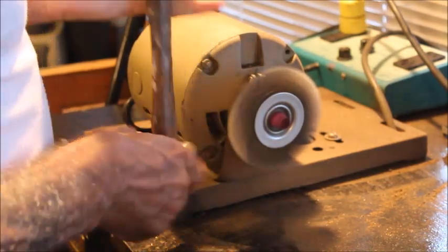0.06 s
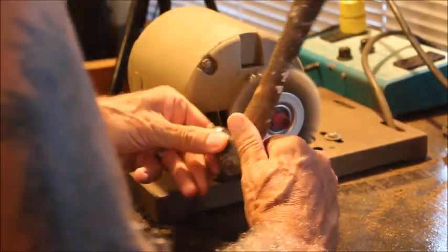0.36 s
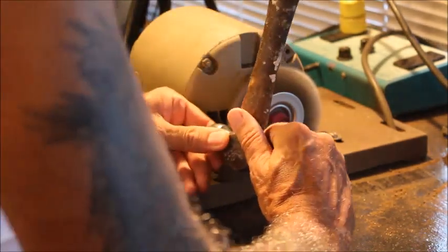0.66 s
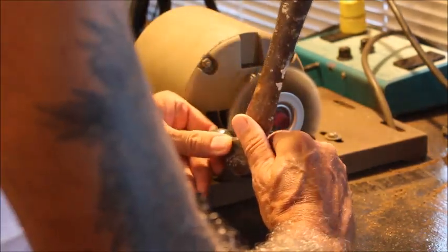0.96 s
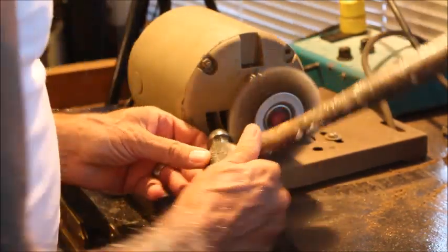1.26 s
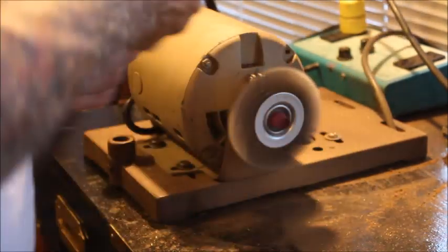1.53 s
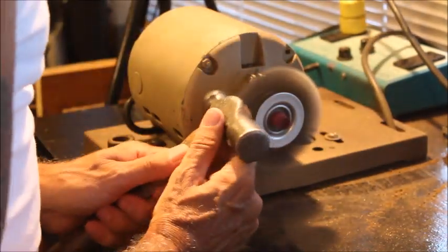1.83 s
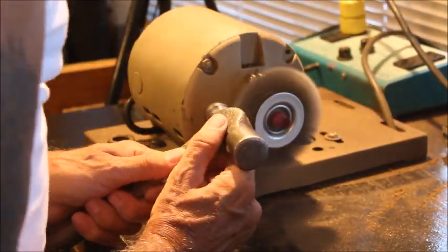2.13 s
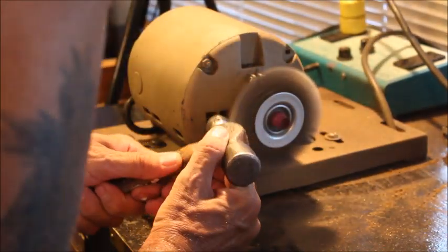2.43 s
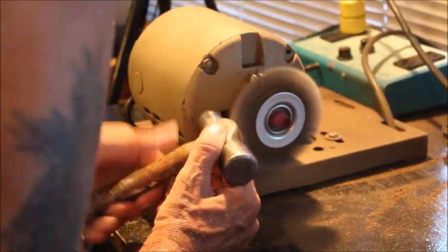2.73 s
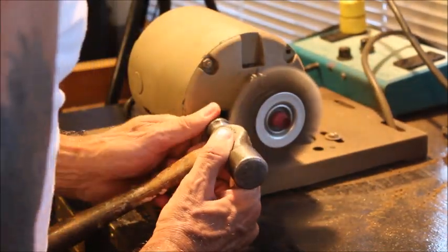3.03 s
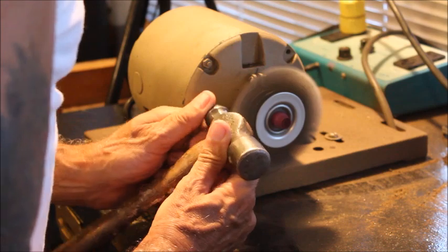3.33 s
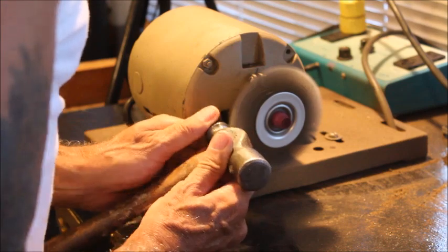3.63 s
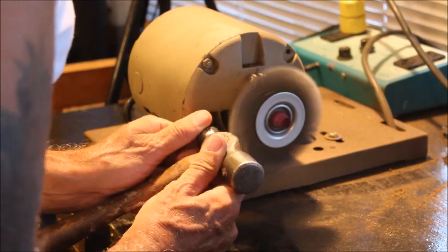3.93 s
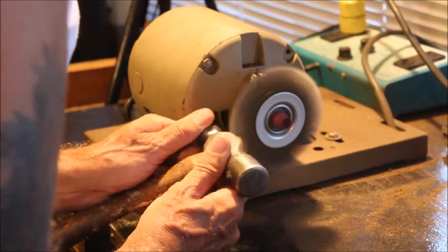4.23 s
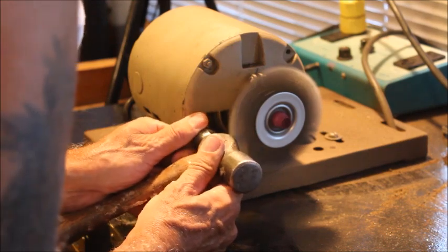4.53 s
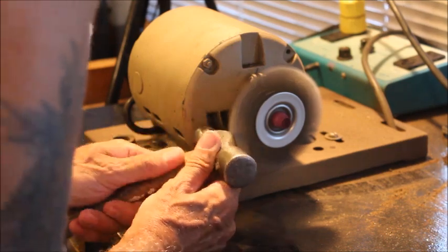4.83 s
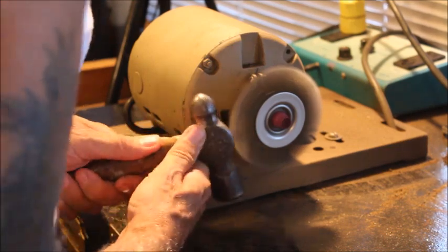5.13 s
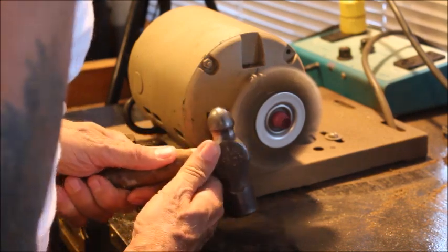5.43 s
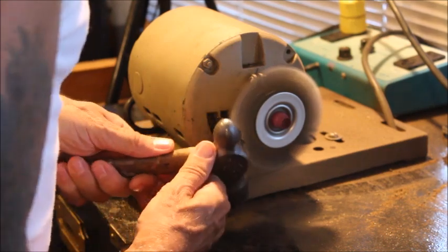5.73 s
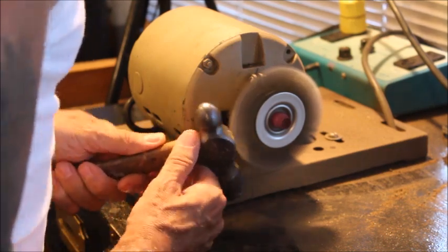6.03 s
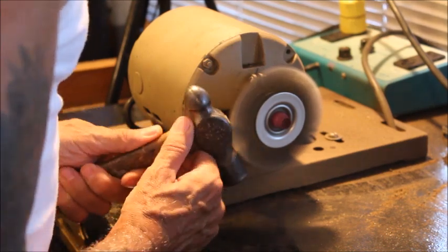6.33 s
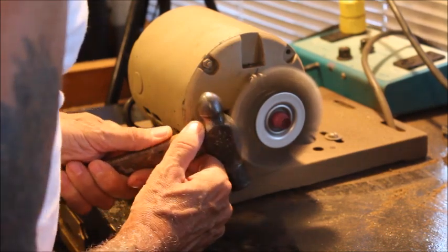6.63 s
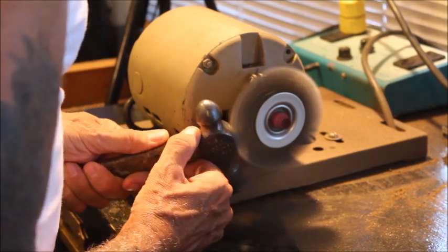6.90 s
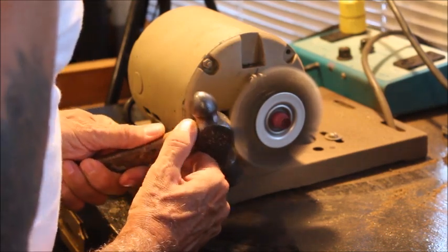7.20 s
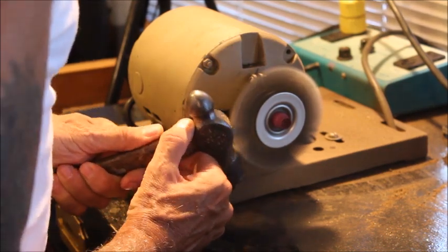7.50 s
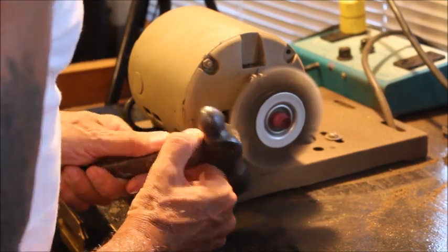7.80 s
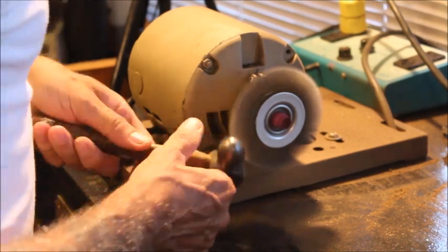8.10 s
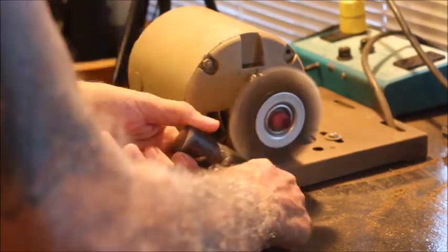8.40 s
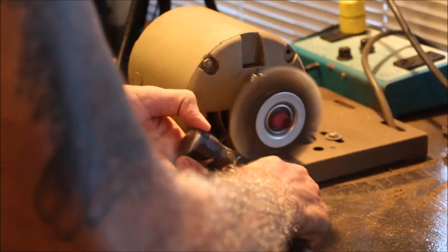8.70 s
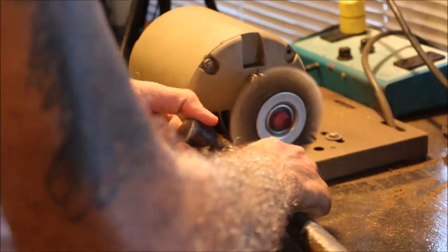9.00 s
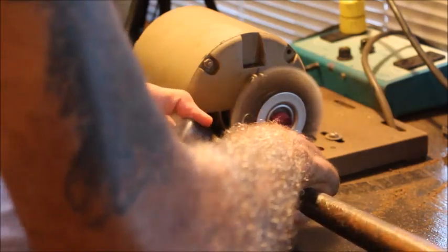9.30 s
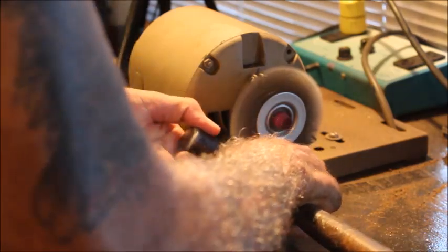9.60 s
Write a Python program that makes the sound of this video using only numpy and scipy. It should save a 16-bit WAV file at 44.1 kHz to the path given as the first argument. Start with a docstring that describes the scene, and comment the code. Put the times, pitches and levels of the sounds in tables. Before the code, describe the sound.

Close up at a workbench, a small bench grinder hums as a steel hammer head is pressed into its wire wheel. The wires rasp, hiss and rattle in a fast buzz whose pitch sags and wavers with the pressure. Early on the hammer lifts off twice, leaving the motor buzzing freely, and clicks once sharply against metal. Then the scouring runs almost unbroken, with a softer click near the end and more ragged rattling.

```python
"""A wire wheel on a small bench grinder scours a steel hammer head, close to one microphone at a workbench.
The lopsided brush slaps the steel twice a turn; its wires rasp, hiss and rattle on the edges, and the
beat sags and wavers as the work drags on the rotor. Behind it the motor hums on the mains and buzzes
when it runs free. Faint tones glide underneath, and twice the hammer clicks against metal."""
import sys
import numpy as np
from scipy import signal
from scipy.fft import rfft, irfft, next_fast_len
from scipy.io import wavfile
from scipy.ndimage import uniform_filter1d, minimum_filter1d, map_coordinates

SR = 44100
rng = np.random.default_rng(int(sys.argv[2]) if len(sys.argv) > 2 else 0)


def to_wav(sig):
    """Store sig (one row per channel, or 1-D mono) as 16-bit WAV at the path in sys.argv[1].

    Samples outside -1..1 are clipped; the rate is SR.
    """
    pcm = np.clip(np.atleast_2d(sig), -1, 1) * 32767
    pcm = np.round(pcm).astype(np.int16)
    wavfile.write(sys.argv[1], SR, pcm.T)  # frames by channels


N = 429975
HUM_HZ, FREE_SLAP_HZ = 120, 119.7  # twice the mains frequency; two slaps a turn with no load

# magnetic hum: multiple of HUM_HZ, level/dB, change under load/dB, more if also flat/dB, waver/dB
HUM_LINES = [(1, -65, -1, 4, 1), (4, -33, -4.5, 4.5, 0.5), (5, -45, 5.5, -23, 0), (7, -38, -4.5, -21, 2)]
# faint tones under the machine: start/s, end/s, first f/Hz, last f/Hz, level/dB
GLIDE_TONES = [(0.47, 0.9, 304, 452, -44.5), (1.985, 2.437, 375, 552, -46), (2.36, 3.054, 275, 406, -38.5),
               (2.629, 3.004, 690, 840, -34), (2.998, 3.457, 415, 583, -41), (3.473, 3.75, 380, 429, -39),
               (3.976, 4.726, 220, 327, -43.5), (4.905, 5.37, 292, 350, -41.5), (4.92, 6.05, 193, 141, -49),
               (7.842, 8.546, 302, 323, -42), (8.3, 8.75, 495, 570, -41), (8.721, 9.414, 405, 447, -42.5)]
# lift of the drone near 835 Hz: t/s, level/dB
DRONE_LIFT = [(.3, -2.5), (1.5, -2), (1.68, 3), (2.1, -7), (2.5, -0.5), (4.05, 2.5), (4.6, -1), (5.85, 2),
              (6.9, 1.5), (8.1, 0.5), (9, -1.5)]
# spectrum of the buzzing housing: f/Hz, level/dB
HOUSING_SPECTRUM = [(120, -32), (236, -22.5), (360, -12), (480, -16), (598, 2.5), (718, -22), (838, -9),
                    (958, -5.5), (1077, -12), (1197, -26), (1437, -3), (1560, 2.5), (1680, -1.5),
                    (1916, -1), (2155, -7.5), (2275, -7), (2515, -2), (2635, 1), (2755, -7), (2875, -7),
                    (3240, -11.5), (3360, -13), (3480, -42), (3720, -31), (3830, -11), (4070, -9),
                    (4550, -17.5), (5400, -18.5)]
# swell of the free-running buzz: t/s, level/dB, tilt to the upper housing resonance/dB
IDLE_SWELL = [(.05, -0.5, -8), (.15, -1, 0), (.27, 0.5, 5.5), (.38, 2.5, -3.5), (1.41, -2.5, -1),
              (1.54, -0.5, 4.5), (1.66, -.5, -3.5), (5.1, 4.5, 1.5), (8.35, -1, -2)]
# spectrum of air and bearings: f/Hz, level/dB
AIR_SPECTRUM = [(25, -32), (70, -16), (105, -11.5), (170, -1.5), (230, -8.5), (320, 4), (900, 6),
                (1200, 0.5), (2600, 5), (4200, -5.5), (5300, -7), (7000, -5), (10000, -8.5), (14500, -14.5)]
# narrow resonances in the air and wire noise: f/Hz, width/Hz, lift/dB
NARROW_PEAKS = [(2640, 110, 5), (3880, 130, 5), (4120, 100, 4), (4460, 120, 6), (4670, 120, 5),
                (7050, 400, 3), (12550, 140, 5), (13400, 120, 4), (14050, 160, 6), (14800, 130, 5)]
# the hammer meets metal: t/s, level/dB, relative knock/dB, relative crack/dB
HAMMER_CLICKS = [(1.588, 2.5, -13, -13), (8.006, -9, 5, -13)]
# modes of the hammer head: f/Hz, level/dB, t60/s
HAMMER_MODES = [(3170, 0.5, 0.039), (4880, -7, 0.051), (5700, -27, 0.074), (6050, -26, 0.054),
                (9500, -3, 0.034), (9650, 7, 0.042), (11450, -8, 0.045), (12400, -27, .026)]
# modes of the knocked machine: f/Hz, level/dB, t60/s
KNOCK_MODES = [(1310, -3.5, 0.05), (1530, 4, 0.046), (2170, -21, .03), (2600, -4.5, 0.046),
               (4160, -5.5, 0.058)]
# the head goes into the wheel: start/s, end/s, contact/0-1
PASSES = [(-.1, .09, .55), (.425, 1.4, 1), (1.725, 5.04, 1), (4.98, 5.24, .42), (5.19, 8, 1),
          (7.93, 8.13, .75), (8.07, 8.48, .45), (8.435, 9.9, 1)]
# drag of the work at full load: t/s, drop in slap rate/Hz
WHEEL_DRAG = [(.45, 1.2), (1.03, 2.4), (1.17, .8), (1.38, .6), (1.8, 1), (1.88, 2.3), (1.97, 1.7),
              (2.14, 2.5), (2.24, 3.7), (2.36, 2.5), (2.76, .6), (3.06, 3), (3.52, 1.8), (3.67, 3.9),
              (3.76, 1.7), (4.04, .8), (4.4, 1.3), (4.73, 1.3), (4.82, .6), (4.92, 1.7), (5.2, .8),
              (5.4, 2.3), (5.5, .8), (6.1, .8), (6.93, 1.2), (7, 1.9), (7.14, 1.2), (7.4, 1.8), (7.55, 1),
              (7.7, 2.8), (7.94, .7), (8.45, .6), (8.62, 1.9), (9, .8), (9.32, 2.1), (9.6, 1)]
# force on the wheel: t/s, level/dB
HAND_FORCE = [(.5, .5), (.95, 0), (1.35, -1.5), (1.8, -1), (2.1, -2.5), (2.45, -1), (2.85, -1.5),
              (3.05, -0.5), (3.6, -0.5), (4.2, -0.5), (5, -1), (5.35, -0.5), (6.1, -1), (6.8, -2),
              (7.8, -1.5), (8.2, 0.5), (8.8, -1.1), (9.75, -1)]
# how the head lies: t/s, flatness/0-1 (edge to cheek), clean beat over rasp/dB
HEAD_LIE = [(.5, 0, 3), (1.08, 0, 4), (1.35, 0, -4), (1.75, .35, -7), (2.35, .6, -4), (2.85, .65, -7),
            (3.05, .15, 1), (3.75, .1, 1), (4.05, 0, 5.5), (4.6, 0, 3), (4.9, 0, -5), (5.3, 0, -1.5),
            (6.1, 0, -2.5), (6.3, .5, -1.5), (6.65, 1, -1), (7.55, 1, -.5), (7.95, 0, -4), (8.6, 0, -1),
            (9.3, 0, -4), (9.7, 0, 2)]
# the wires snag an edge: t/s, extra rubbing/dB, rattle level/dB
SNAGS = [(1.743, 1, -35), (1.94, 4, -35), (4.85, 1.5, -35), (5.571, 2.5, -36), (5.81, 2, -37),
         (6.09, 3.5, -34), (6.465, 5.5, -30), (6.98, 3, -37), (7.91, 2, -34), (8.065, 2, -37),
         (8.265, 1, -36), (8.452, 1.5, -33), (8.745, 1, -31), (8.938, 2.5, -29), (9.03, 2, -30),
         (9.135, 1.5, -32), (9.243, 3, -30), (9.402, 1, -32)]
# brief dips in the level of the rubbing and hiss: t/s, level/dB
LEVEL_DIPS = [(2.835, -6), (6.005, -4), (6.55, -4), (8.98, -4)]
# spectrum of the base rocking on the bench: f/Hz, level/dB
ROCK_SPECTRUM = [(90, -60), (236, -26), (355, 0), (472, -37), (590, -5), (710, -1), (830, -36), (950, -9),
                 (1200, -51), (1600, -66)]
# spectrum of the base shaking: f/Hz, level/dB
THUD_SPECTRUM = [(90, -60), (236, -39), (355, -25), (472, -4), (590, -7), (710, -14), (830, 5), (950, -5),
                 (1065, 1), (1200, -10), (1600, -70)]
# the head chatters and sings: start/s, end/s
SING_SPAN = (1.92, 2.29)
# resonances of the singing head: f/Hz, width/Hz, level/dB
SING_BANDS = [(1480, 480, -36.5), (1837, 170, -30), (2220, 210, -27), (2890, 113, -35), (3670, 190, -42.5)]
# the wire ends just tick the steel: start/s, end/s (a reversed span is silent)
GRAZE_SPANS = [(5.02, 5.22), (8.11, 7.4)]
# resonances of the grazed head: f/Hz, width/Hz, level/dB
GRAZE_BANDS = [(1590, 250, -41), (2620, 260, -35), (4200, 420, -42)]
# rattle on the edge between snags: t/s, level/dB
EDGE_LEVEL = [(.5, -42), (1.3, -36), (2.1, -43), (2.7, -39), (3.9, -41), (4.9, -37), (6.1, -36), (6.7, -45),
              (7.6, -44), (8.6, -38), (9.7, -38)]
# spectrum of wire ends striking an edge: f/Hz, level/dB
RATTLE_SPECTRUM = [(900, -17), (1500, 4), (2700, 6.5), (3300, -4.5), (4500, -1), (5400, -14.5),
                   (9000, -16.5), (15000, -21)]
# spectrum of the hissing wire tips: f/Hz, level/dB
TIP_SPECTRUM = [(4500, -30), (6000, -11), (7200, -8), (10000, -9.5), (11300, -7.5), (12400, -1), (13800, 0),
                (15800, -1.5)]
# spectrum of the scraping wires: f/Hz, level/dB
RASP_SPECTRUM = [(1150, -2), (1550, 0), (2250, 4), (2450, -2.5), (2750, 0.5), (3250, -13.5), (3900, -26.5),
                 (4700, -32), (5300, -35)]
# spectrum of the brush beating on steel: f/Hz, level/dB
BEAT_SPECTRUM = [(1170, 2), (1300, -2.5), (1420, -4), (1540, 0), (1655, 4), (1770, -2), (1890, 2),
                 (2010, -3), (2130, 0), (2240, 4), (2360, -3), (2480, -4), (2640, 2), (2850, -2),
                 (3300, -22), (3750, -34), (5200, -40)]
# resonances of machine and work: f/Hz, width/Hz, level/dB, change when flat/dB, dB per dB of force
RUBBED_BANDS = [(1351, 198, -39.5, 6, 3), (1528, 190, -32, -7, 3), (1700, 240, -32, 1.5, 2),
                (1890, 148, -35, -2, 5), (1982, 140, -38.5, 12, 4.5), (2187, 340, -33.5, 6, 3),
                (2857, 1000, -31.5, -5.5, 1.84), (4970, 2590, -37, -4.5, 2.5)]


def amp(db):
    """Decibels to gain."""
    return np.exp(np.asarray(db) * (np.log(10) / 20))


def unit(x):
    """Scale to rms 1."""
    return x / np.sqrt(np.mean(x ** 2) + 1e-20)


def clock():
    """The time of every sample."""
    return np.arange(N) / SR


def curves(rows):
    """One value per sample for each column after the time."""
    times, *columns = np.transpose(rows)
    return [np.interp(clock(), times, column) for column in columns]


def wobble(rate):
    """A smooth random curve, rate knots a second."""
    coarse = clock()[::64]
    knots = rng.standard_normal(int(N * rate / SR) + 4)
    return np.interp(clock(), coarse, map_coordinates(knots, [coarse * rate]))


def bumps(rows, width_s):
    """A smooth bump for each (t/s, height)."""
    coarse = clock()[::32]
    shapes = (height * np.maximum(1 - ((coarse - s) / (2 * width_s)) ** 2, 0) ** 2 for s, height in rows)
    return np.interp(clock(), coarse, sum(shapes))


def filtered(x, response):
    """x times a response of frequency."""
    size = next_fast_len(N + 8192)
    return irfft(rfft(x, size) * response(np.fft.rfftfreq(size, 1 / SR)), size)[:N]


def highpass(x, hz):
    """x with the lows rolled off."""
    return signal.sosfilt(signal.butter(2, hz, "high", fs=SR, output="sos"), x)


def coloured(x, spectrum):
    """x through a spectrum drawn on a log frequency axis, at rms 1."""
    points_hz, db = np.transpose(spectrum)
    return unit(filtered(x, lambda hz: amp(np.interp(np.log(hz + 1), np.log(points_hz), db))))


def band(x, centre_hz, width_hz):
    """The part of x within one flat-topped resonance."""
    return filtered(x, lambda hz: 1 / (1 + ((hz - centre_hz) / (width_hz / 2)) ** 8))


def swelled(x, gain_db, centre_hz, width_hz):
    """x with one resonance raised or lowered over time."""
    return x + (amp(gain_db) - 1) * band(x, centre_hz, width_hz)


def peaked(x):
    """x with the narrow resonances lifted."""
    return filtered(x, lambda hz: amp(sum(db / (1 + ((hz - centre) / (width / 2)) ** 2)
                                          for centre, width, db in NARROW_PEAKS)))


def pulses(phase, spread_rad):
    """One pulse per cycle of phase, smeared by its many paths through the metal."""
    half = np.sin(phase / 2)
    train = np.sin(45.5 * phase) / np.where(np.abs(half) < 1e-9, 1e-9, half) - 1  # 45 equal harmonics
    lag = spread_rad * rng.standard_normal(64)
    return filtered(train, lambda hz: np.exp(1j * np.interp(hz, HUM_HZ * np.arange(len(lag)), lag)))


def glides():
    """Faint hollow tones slide up and down under the hum."""
    out = np.zeros(N)
    flutter = .9 + .45 * wobble(55)
    for start, end, from_hz, to_hz, db in GLIDE_TONES:
        first, last = int(start * SR), min(int(end * SR), N)
        hz = np.linspace(from_hz, to_hz, last - first)
        fade = signal.windows.tukey(len(hz), .6)
        out[first:last] += np.sqrt(2) * amp(db) * fade * np.sin(2 * np.pi * np.cumsum(hz) / SR)
    return out * flutter


def hum(load, flat):
    """The stator sings at multiples of twice the mains frequency; load shifts their balance."""
    phase = 2 * np.pi * HUM_HZ * clock()
    out = np.zeros(N)
    for harmonic, db, load_db, flat_db, waver_db in HUM_LINES:
        gain = amp(db + load * (load_db + flat * flat_db) + waver_db * wobble(16))
        out += np.sqrt(2) * gain * np.cos(harmonic * phase + rng.uniform(0, 2 * np.pi))
    return out


def motor(phase, free, buzz_db=-27, air_db=-34, throb_db=3):
    """The free rotor buzzes the housing twice a turn; the wheel stirs the air throughout."""
    shaking = pulses(phase + .008 * wobble(45), spread_rad=1.7) * amp(.6 * wobble(70))
    buzz = coloured(shaking, HOUSING_SPECTRUM)
    level_db, tilt_db = curves(IDLE_SWELL)
    buzz = swelled(buzz, -tilt_db, centre_hz=1555, width_hz=210)
    buzz = swelled(buzz, tilt_db, centre_hz=2635, width_hz=320)
    draught = rng.standard_normal(N) * amp(throb_db * np.cos(phase))
    air = coloured(peaked(draught), AIR_SPECTRUM)
    return free * amp(buzz_db + level_db) * buzz + amp(air_db) * air


def struck(modes, t):
    """Damped modes, a little different at each blow."""
    return sum(amp(db + rng.normal(0, 0.79) - 60 * t / t60)
               * np.sin(2 * np.pi * hz * t + rng.uniform(0, 2 * np.pi)) for hz, db, t60 in modes)


def clicks(crack_t60_s=0.068, attack_s=0.00034):
    """Steel on steel at the bench: a crack, a short ring damped by the hand, and a knock."""
    out, t = np.zeros(N + SR), np.arange(SR // 8) / SR
    for s, db, knock_db, crack_db in HAMMER_CLICKS:
        crack = highpass(rng.standard_normal(len(t)), hz=2500) * amp(-60 * t / crack_t60_s)
        ring = 0.094 * struck(HAMMER_MODES, t) + 0.2 * amp(knock_db) * struck(KNOCK_MODES, t)
        ring *= 1 - np.exp(-t / attack_s)
        out[round(s * SR):][:len(t)] += amp(db) * (ring + amp(crack_db) * crack)
    return out[:N]


def held(start, end, bite_s=.018, release_s=.0414):
    """The wires bite, hold and let go, 0-1."""
    t = clock()
    return np.clip(np.minimum((t - start) / bite_s, (end - t) / release_s), 0, 1)


def slap_phase(load, inertia_s=.0285):
    """Two cycles a turn: drag slows the rotor, inertia smooths the change."""
    pole = np.exp(-1 / (inertia_s * SR))
    lost_hz = signal.lfilter([1 - pole], [1, -pole], load * curves(WHEEL_DRAG)[0])
    return 2 * np.pi * np.cumsum(FREE_SLAP_HZ - lost_hz) / SR


def wires(phase, memory, per_slap=400):
    """Noise that changes only gradually from slap to slap, as the same wires come round again."""
    cycles = phase / (2 * np.pi)
    fresh = rng.standard_normal((N // 300, per_slap))
    kept = signal.lfilter([1], [1, -2 * memory, memory ** 2], fresh, axis=0).ravel()
    return np.interp(cycles * per_slap, np.arange(len(kept)), kept)


def base(phase, slaps, flat, thud_db=-38, rock_db=-46):
    """The grinder's base shakes with each slap; a flat cheek and heavy drag set it rocking."""
    shake = highpass(unit(slaps) + 1.9 * unit(wires(phase, memory=.52)), hz=200)
    thud = amp(thud_db - 4 * flat + wobble(13)) * coloured(shake, THUD_SPECTRUM)
    rock = amp(rock_db + 7 * flat + curves(WHEEL_DRAG)[0]) * coloured(shake, ROCK_SPECTRUM)
    return thud + rock


def singing(phase, bands, scrape):
    """Even slaps and a little scraping keep the head's own resonances ringing."""
    slaps = unit(pulses(phase, spread_rad=1.2)) * amp(1.6 * wobble(80))
    drive = slaps + scrape * unit(wires(phase, memory=.3))
    return sum(amp(db) * unit(band(drive, hz, width)) for hz, width, db in bands)


def rattle(phase, contact, fade_s=.0045, uneven_db=1.7):
    """On an edge each slap is a ragged tick of wire ends; a snag gives a few hard ones."""
    slap, fraction = np.divmod(phase / (2 * np.pi) + .1 + .09 * wobble(110), 1)
    strength = amp(uneven_db * rng.standard_normal(N // 300))[slap.astype(int)]
    bursts = rng.standard_normal(N) * strength * np.exp(-fraction / (FREE_SLAP_HZ * fade_s))
    ticks = coloured(peaked(bursts), RATTLE_SPECTRUM)
    between = contact * amp(curves(EDGE_LEVEL)[0] + 2 * wobble(22))
    snagged = bumps([(s, amp(db)) for s, _, db in SNAGS], width_s=.01)
    return ticks * (between + snagged)


def tips(phase, flat, hiss_db=-36, split_hz=9500, ripple_hz=70):
    """The wire tips hiss almost evenly, each at its own pitch; a flat cheek shifts the hiss upwards."""
    noise = rng.standard_normal(N) * amp(np.cos(phase) + wobble(200))
    ripple_db = 2 * rng.standard_normal(512)
    sizzle = filtered(noise, lambda hz: amp(np.interp(hz, ripple_hz * np.arange(512), ripple_db)))
    sizzle = coloured(peaked(sizzle), TIP_SPECTRUM)
    low = filtered(sizzle, lambda hz: hz < split_hz)
    high = sizzle - low
    flicker = amp(.8 * wobble(24))
    return amp(hiss_db) * flicker * (amp(-2 * flat) * low + amp(1.8 * flat) * high)


def scratches(phase, count=9000):
    """Single stiff wires flick the steel at random, a few of them hard, most sharply during a slap."""
    when, side, softness = rng.random((count, 3)).T
    sizes = np.sign(side - .5) * amp(-5.5 * np.log(.03 + softness))
    flicks = np.bincount((when * N).astype(int), sizes, N)
    return coloured(flicks * (1 + .5 * np.cos(phase)), RASP_SPECTRUM)


def brush(phase, flat, clean_db, snag_db, steel_db=.88, scratch_db=-6, sway_db=1.12):
    """Close to the microphone, the lopsided brush slaps the steel twice a turn in a spray of wires."""
    slaps = pulses(phase + .022 * wobble(30), spread_rad=1.9) * amp(.8 * wobble(40))
    spray = amp(np.cos(phase) + 2 * wobble(400))
    rasp = coloured(peaked(wires(phase, memory=.43) * spray), RASP_SPECTRUM)
    clean = amp(clean_db)
    beat = clean * coloured(slaps, BEAT_SPECTRUM)
    rub = (beat + rasp + amp(scratch_db) * scratches(phase)) / np.sqrt(1 + clean ** 2)
    force_db, = curves(HAND_FORCE)
    steel = np.zeros(N)
    for hz, width, db, flat_db, follow in RUBBED_BANDS:
        # force and lie reweight the resonances; a snag lifts the high ones most
        level_db = db + flat * flat_db + force_db * follow + snag_db * hz / 3000
        steel += amp(level_db + sway_db * wobble(12)) * unit(band(rub, hz, width))
    return amp(steel_db) * steel + base(phase, slaps, flat)


def scene(judder_db=.5, sing_rub_db=-5.5, opening_db=-9, opening_s=.082):
    """The grinder, the work against it and the small knocks, from beside the bench, in mono."""
    touch = np.max([depth * held(start, end) for start, end, depth in PASSES], axis=0)
    load = touch ** 4  # only firm contact loads the motor
    phase = slap_phase(load)
    flat, clean_db = curves(HEAD_LIE)
    sing = held(*SING_SPAN)
    graze = sum(held(*span) for span in GRAZE_SPANS)
    snag_db = bumps([(s, db) for s, db, _ in SNAGS], width_s=.0092) + .8 * wobble(24)
    dip_db = bumps(LEVEL_DIPS, width_s=.02)
    # the rubbing judders, dips briefly, and gives way while the head sings
    contact = touch * amp(judder_db * wobble(32) + dip_db)
    rubbing = contact * amp(sing_rub_db * sing) * brush(phase, flat, clean_db, snag_db)
    rubbing += rattle(phase, contact)
    ringing = sing * singing(phase, SING_BANDS, scrape=.7)
    ringing += graze * singing(phase, GRAZE_BANDS, scrape=.6)
    # the tips hiss much less at a graze, and a little more at a snag
    hiss = touch ** 1.7 * amp(.6 * (snag_db + dip_db)) * tips(phase, flat)
    machine = hum(load, flat) + motor(phase, free=1 - touch ** .77) + rubbing + ringing + hiss + glides()
    machine = swelled(machine, curves(DRONE_LIFT)[0], centre_hz=835, width_hz=100)
    # the level comes up during the first moment
    opening = amp(opening_db * np.clip(1 - clock() / opening_s, 0, 1))
    return (opening * machine + clicks())[None]


def record(dry, threshold_db=-15.5, smooth_s=.007, top_hz=15790):
    """Behind the microphone a limiter ducks after loud bursts; nothing passes above the band limit."""
    x = dry[0]
    power = np.abs(uniform_filter1d(x ** 2, size=66))
    over_db = np.maximum(10 * np.log10(power + 1e-12) - threshold_db, 0)
    held_db = -minimum_filter1d(-over_db, size=882, origin=400)  # peaks hold for 20 ms
    pole = np.exp(-1 / (smooth_s * SR))
    duck_db = 1.3 * signal.lfilter([1 - pole], [1, -pole], held_db)
    return filtered(x * amp(-duck_db), lambda hz: hz < top_hz)[None]


dry = scene()
out = record(dry)
to_wav(out)
```